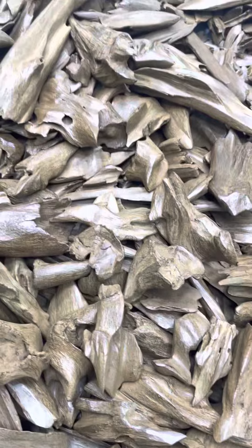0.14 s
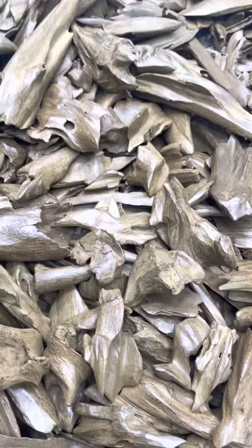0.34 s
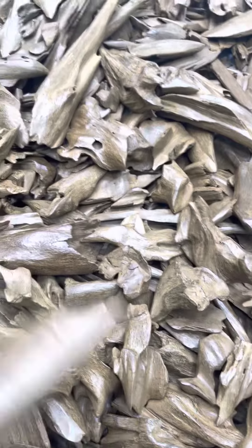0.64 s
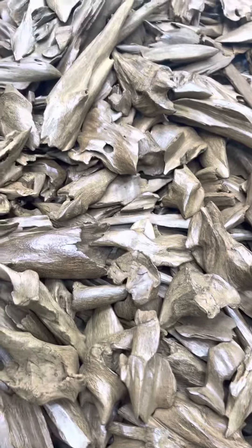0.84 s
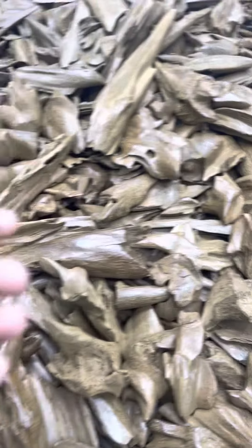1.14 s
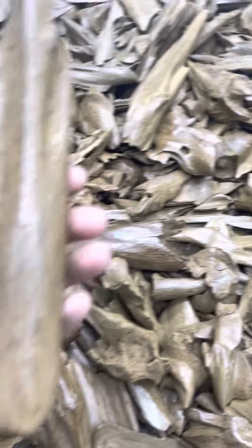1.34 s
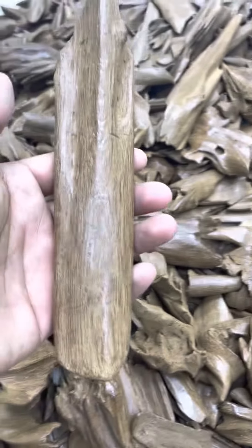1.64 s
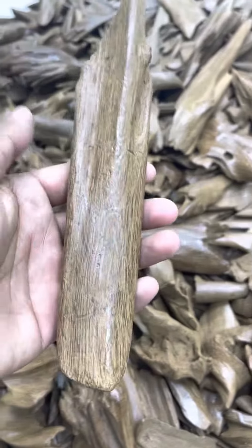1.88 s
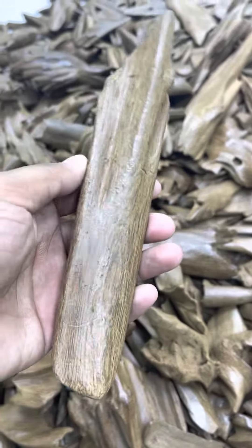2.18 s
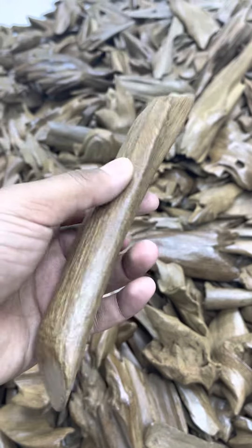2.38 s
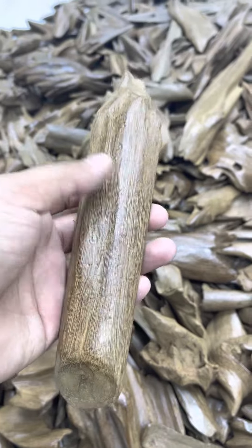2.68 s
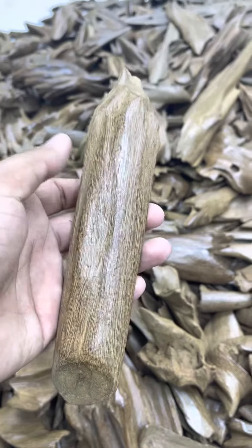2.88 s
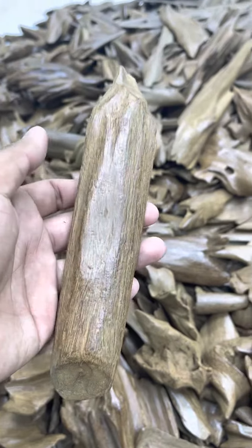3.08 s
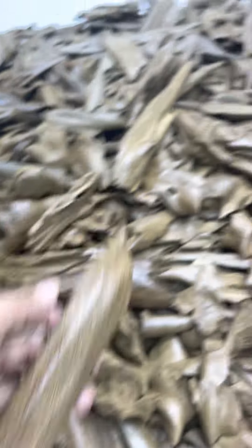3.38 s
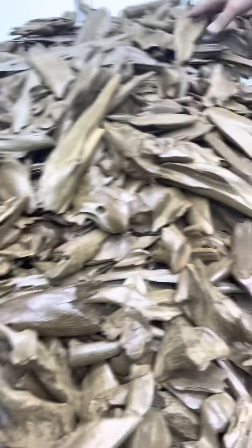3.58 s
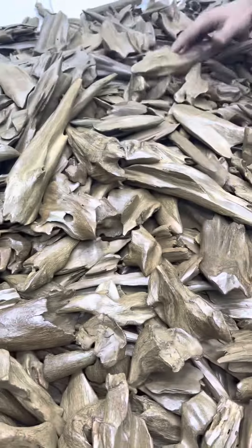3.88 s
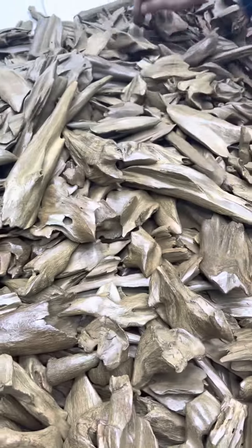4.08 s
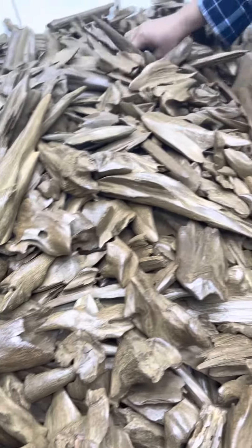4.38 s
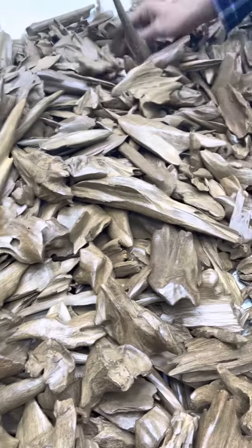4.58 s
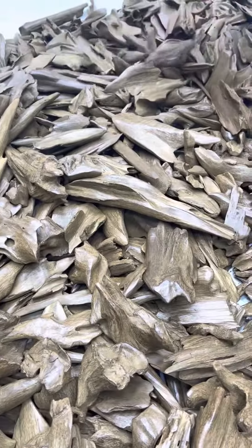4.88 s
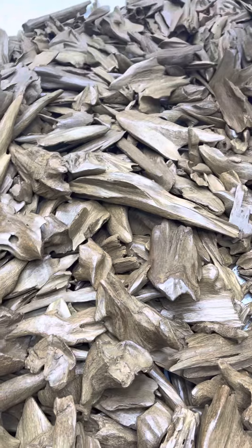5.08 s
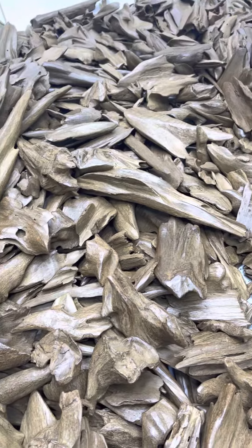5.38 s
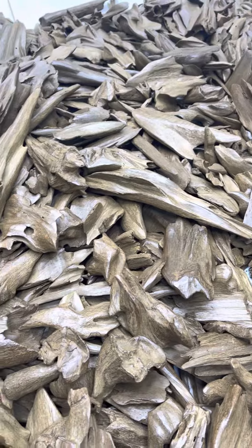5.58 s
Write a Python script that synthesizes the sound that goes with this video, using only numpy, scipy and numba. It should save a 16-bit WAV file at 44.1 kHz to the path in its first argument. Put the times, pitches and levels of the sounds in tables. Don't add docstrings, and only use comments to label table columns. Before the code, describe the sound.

Close to a phone indoors, a hand stirs a big heap of dry wood chips. Sparse soft taps grow into dense crackling rustle and bright splinter snaps. Midway a short stick clacks down and bounces once, then loud chip knocks ring on, thinning to a few last settling taps. A faint far-off double boom and low room rumble lie beneath.

```python
import sys
import numpy as np
from scipy import signal
from scipy.fft import rfft, irfft, next_fast_len
from scipy.io import wavfile
from scipy.ndimage import uniform_filter1d
from numba import njit

SR = 44100
rng = np.random.default_rng(int(sys.argv[2]) if len(sys.argv) > 2 else 0)


def volts_from_db(level):
    exponent = np.asarray(level, float) / 20
    return 10 ** exponent


def master_out(mix):
    frames = np.transpose(np.atleast_2d(mix))
    ceiling = np.clip(frames, -1, 1)
    pcm = np.round(ceiling * 32767).astype(np.int16)
    wavfile.write(sys.argv[1], SR, pcm)


N = 252693

# [t/s, level/dB]
RUMBLE_SWELL = [(0, -49.5), (.45, -48.5), (1.5, -48), (2.03, -46), (2.46, -43), (2.8, -49.5), (4.15, -51.5),
                (4.5, -47.5), (5.73, -50.5)]
# [f/Hz, level/dB]
RUMBLE_COLOUR = [(12, -41), (22, -24), (32, -1.5), (55, 10), (189, 0.5), (225, 1), (476, -6), (524, -12),
                 (576, -5), (900, -7.5), (1170, -16), (1980, -120)]
# [f/Hz, level/dB]
HISS_COLOUR = [(300, 4.5), (2000, -5), (5000, -10.5), (11500, 1), (12500, -47)]
HISS_DB = -54.5
WAKE_S, WAKE_FROM = 0.29, 0.48
# [f/Hz, t60/s]
WALLS = [(200, 0.63), (1000, 1), (3000, 0.54), (6000, 0.47), (12000, 0.58)]
# [t/s, level/dB, f/Hz]
BOOMS = [
    (2.401, -36, 118),
    (2.565, -40.5, 74),
]
BOOM_RISE_S, BOOM_FADE_DB_PER_S, BOOM_SAG_PER_S = 0.016, 63, 1.57

# [t/s, peak level/dB, f/Hz, t60/s]
THUMPS = [
    (.87, -39, 192, 0.22),
    (1.579, -38, 151, .3),
    (2.956, -38, 298, 0.055),
    (3.085, -35, 312, 0.068),
    (3.54, -25.5, 330, 0.041),
    (3.54, -19, 570, 0.033),
    (3.563, -33.5, 264, 0.06),
    (4.25, -42, 310, .08),
    (5.439, -39.5, 192, 0.22),
]
# [t/s, peak level/dB]
SPARKS = [(1.2037, -44), (1.2674, -55), (1.9594, -37), (2.1594, -36), (2.1755, -36), (2.5072, -38),
          (2.61, -37), (2.7886, -45), (3.0044, -52), (3.0974, -43), (3.2196, -35), (3.2784, -30),
          (3.6152, -44), (4.0634, -39), (4.0745, -24), (4.1036, -32), (4.1195, -35), (4.3051, -44),
          (4.59, -50), (4.6034, -50)]
# [t/s, peak level/dB, f/Hz]
TAPS = [(0.209, -35, 1340), (0.243, -27.5, 2520), (0.346, -31, 1900), (0.495, -28, 1310),
        (0.529, -23, 2080), (0.547, -28, 1390), (0.575, -23, 2260), (0.632, -30, 1240), (0.666, -24, 2030),
        (0.893, -24, 2120), (0.949, -23, 2230), (0.995, -25, 1890), (1.016, -23.5, 1910),
        (1.081, -22, 2250), (1.205, -35, 2480), (1.232, -31, 2350), (1.249, -28, 1190), (1.27, -27, 2540),
        (1.368, -40, 830), (1.427, -33, 3250), (1.848, -17, 4260), (1.999, -18, 1890), (2.044, -13, 2320),
        (2.062, -16, 1190), (2.09, -17.5, 1000), (2.244, -17, 2070), (2.29, -23, 1300), (2.35, -22, 1830),
        (2.459, -21, 2100), (2.594, -10, 6300), (2.795, -28, 1600), (3.088, -13, 2100), (3.148, -14, 2000),
        (3.231, -10.5, 2720), (3.415, -21, 3720), (3.473, -26, 2820), (3.699, -11, 2360),
        (3.869, -20, 3020), (3.884, -8, 2700), (3.919, -19, 2870), (4.103, -15, 6240), (4.246, -22, 2150),
        (4.345, -12, 1650), (4.361, -15, 1680), (4.59, -11, 2220), (4.734, -26, 1620), (5.1, -35, 2450),
        (5.167, -33, 960), (5.247, -36, 1920), (5.297, -39, 1900), (5.349, -30, 2300), (5.367, -23, 2750),
        (5.534, -21.5, 3650), (5.616, -38, 860), (5.689, -24, 710)]
# [t/s, peak level/dB]
TICKS = [(.252, -34), (.496, -36), (1.174, -33.5), (1.183, -39), (1.204, -32.5), (1.216, -34), (1.252, -28),
         (1.268, -30), (1.79, -22.5), (1.928, -14.5), (1.981, -19.5), (2.175, -19), (2.246, -18.5),
         (2.294, -16.5), (2.35, -19), (2.497, -20), (2.508, -23), (2.594, -21.5), (2.653, -26),
         (2.737, -20.5), (2.758, -23.5), (2.956, -27), (2.974, -31), (3.01, -24), (3.038, -30),
         (3.097, -14), (3.132, -19), (3.222, -24), (3.2313, -19), (3.277, -15.5)]
# [t/s, peak level/dB]
TICKS_AFTER = [(3.54, -15), (3.562, -18.5), (3.5809, -24), (3.615, -20.5), (3.643, -18.5), (3.895, -17.5),
               (4.042, -19.5), (4.064, -21), (4.075, -18.5), (4.119, -6), (4.153, -21), (4.2078, -18.5),
               (4.249, -22), (4.281, -20.5), (4.306, -18.5), (4.5907, -18.5), (4.715, -26.5), (4.734, -31),
               (4.837, -25), (5.099, -38), (5.1544, -31.5), (5.329, -41), (5.389, -35), (5.428, -30),
               (5.447, -43), (5.472, -41), (5.504, -35.5), (5.663, -36), (5.716, -36)]
SNAP_S, SNAP_LOW_HZ = .0055, 5420
SNAP_TOP_HZ, SNAP_TOP_AFTER_HZ = 14700, 12100
SNAP_ASIDE_DB = 10.5

# [from t/s, to t/s, f/Hz, level/dB]
ROCKING = [(0.363, .58, 1245, -46.5), (0.878, 1.047, 1910, -45), (1.78, 1.998, 2750, -36),
           (2.73, 2.92, 1660, -46), (2.722, 3.141, 2070, -38), (3.078, 3.299, 2720, -37.5),
           (3.581, 3.747, 1770, -52), (3.85, 4.1, 2926, -35.5), (4.32, 4.756, 1680, -36.5),
           (4.52, 4.747, 2295, -39.5), (4.58, 4.952, 1273, -47), (4.954, 5.067, 932, -41.5),
           (5.15, 5.191, 933, -50), (4.3, 4.32, 2660, -35.5)]
# [t/s, peak level/dB, ring
# f/Hz, ring share level/dB]
KNOCKS = [(0.363, -20.5, 2240, -11), (.391, -29, 1290, 0), (.446, -28, 1250, -8), (.514, -20, 1400, -3.5),
          (.702, -35, 1970, 7), (.766, -22.5, 2150, -12), (.832, -23, 1580, -8), (.905, -22, 4030, -9),
          (.93, -37, 1770, 1), (1.068, -20, 2330, -9.5), (1.441, -25.5, 3370, -5), (1.495, -21.5, 1370, -9),
          (1.768, -27.5, 2280, -2), (1.787, -14, 2870, -4.5), (1.875, -24, 2200, -2),
          (1.932, -7.5, 2845, -9.5), (1.963, -8, 3600, -9), (2.498, -23, 2600, -5), (2.623, -16, 1780, -8),
          (2.673, -14, 2870, -11), (2.737, -25.5, 1660, 3.5), (2.851, -25.5, 1655, 4.5),
          (2.887, -27, 1600, 5.5), (2.955, -20, 1095, 0.5), (3.017, -15.5, 2780, -10.5),
          (3.098, -10, 2050, -9.5), (3.131, -12, 2770, -2), (3.222, -10, 2830, -23),
          (3.274, -11.5, 2580, -13),
          (3.628, -4.5, 1715, -19), (3.683, -26, 2400, 4), (3.786, -18.5, 2630, -4),
                (3.8, -13, 2200, -11), (3.846, -21, 3160, -3), (3.896, -9, 3910, -21),
                (4.039, -29, 1775, -0.5), (4.098, -31.5, 2150, 1), (4.159, -21, 1772, 5.5),
                (4.199, -12, 1800, -10), (4.292, -6.5, 3620, -12), (4.325, -17, 1687, -3.5),
                (4.525, -16, 2320, -5), (4.554, -16, 2310, -15), (4.6, -30.5, 1293, 2),
                (4.639, -22.5, 3430, -5), (4.714, -16, 2180, -24), (4.756, -25, 2525, -8),
                (4.838, -21, 2280, -24), (4.87, -15.5, 1295, -10.5), (4.968, -30, 930, -2),
                (5.003, -17, 2804, -13), (5.154, -27, 2940, -9), (4.307, -11, 2710, -11.5),
                (4.42, -35, 2330, -6), (4.899, -21.5, 1277, -8.5), (5.03, -25, 2490, -9),
                (5.071, -46, 1880, -14),
          (5.197, -42, 1020, 4), (5.32, -22.5, 1950, -6), (5.332, -21, 1130, -32),
               (5.39, -18.5, 1230, -29), (5.421, -27, 900, -16), (5.43, -9, 2267, -12.5),
               (5.45, -14, 1450, -12.5), (5.477, -18.5, 1080, -25), (5.509, -20, 1740, -12.5),
               (5.525, -28.5, 706, 0.5), (5.632, -22, 2620, -14), (5.66, -20.5, 1940, -6.5),
               (5.669, -22.5, 760, 0), (5.715, -11.5, 1450, -13)]
ALL_KNOCKS = KNOCKS
RING_T60_S, RING_AFTER_T60_S = 0.034, 0.089
LOOSE_FROM_S, LOOSE_TO_S = 3.6, 5.18
CRACK_DB, CRACK_S = -7, 0.0009

# [f/Hz, level/dB, t60/s]
STICK = [(750, -4.5, 0.021), (1722, 0.5, 0.037), (2870, -2.5, 0.033), (3890, -17.5, 0.078)]
# [t/s, level/dB, ring length share/0-1]
DROPS = [
    (3.5392, -5.5, 0.88),
    (3.5618, 0, 0.23),
]

# [t/s, rustle level/dB, brightness/dB, crowding/0-1 from single chips to a sliding mass]
HAND = [(0, -65, 8, 0.84), (.1, -57, -20, 0.71), (.39, -41.5, -7.5, 0.6), (.71, -44.5, -13, 0.57),
        (.92, -37, -10, .58), (1.17, -46, -15, 0.7), (1.35, -53, 5, 0.4), (1.75, -43.5, -2, 0.96),
        (1.95, -27.5, -5, .95), (2.27, -25.5, -6.5, .65), (2.46, -36, -6, .55), (3.25, -34, -8.5, .52),
        (3.5, -43, -8, 0.6), (3.69, -24, -9, .52), (4.04, -34, -8.5, .58), (4.82, -37, -9, 0.6),
        (5.12, -55.5, -8, 0.5), (5.73, -50.5, -14, 0.3)]
# [peak t/s, level/dB, swell/s, settle/s, brightness/dB]
SLIDES = [(.524, -46, 0.071, 0.13, -14), (1.246, -39.5, 0.059, 0.14, -8), (1.189, -59, 0.012, 0.12, 0),
          (1.506, -28.5, 0.15, 0.35, -9.5), (1.802, -34.5, 0.12, 0.25, -11), (2.524, -33, 0.17, 0.44, -7.5),
          (2.829, -38, 0.26, 0.094, 9), (3.127, -28.5, 0.12, .15, 1), (3.253, -34.5, 0.24, 0.22, 8),
          (3.562, -15, 0.027, 0.028, -24), (4.099, -30, 0.12, 0.27, -6), (4.329, -24.5, 0.12, 0.27, -6.5),
          (4.621, -32, 0.33, 0.086, -3), (4.744, -32.5, 0.088, 0.14, -6.5),
          (4.989, -32.5, 0.38, 0.18, -10.5), (5.183, -39.5, 0.23, 0.033, -33),
          (5.343, -42, 0.068, 0.13, -13), (5.458, -37.5, 0.25, 0.071, -6), (5.665, -39.5, 0.052, 0.25, -11)]
SLIDE_SPAN_DB = 22
CROWD_LEAST, CROWD_PER_S = .28, 1.3
# [f/Hz, level/dB]
CHIPS = [(200, -6.5), (500, -9.5), (900, -1.5), (1800, 2.5), (3000, 4), (4000, -1.5), (5500, -21)]
# [f/Hz, level/dB]
SPLINTERS = [(2500, 20.5), (4500, -1.5), (6000, -3.5), (8000, -1), (11800, -0.5), (12800, -38)]
# [f/Hz, level/dB]
FARTHER = [(9000, 0), (11000, -3.5), (12000, -10), (13000, -14)]
SLIP_DB, GRIT_DB = 1.5, 2.5
SHAKE_DB, SHAKE_S = 5.5, .012

# [f/Hz, level/dB]
MICROPHONE = [(10000, 0.5), (11000, -3.5), (11700, -12), (12300, -11.5), (13500, -20), (16000, -28)]
# [f/Hz, phase/rad]
LEAD = [(30, 0), (1800, .05), (2200, .35), (2600, .9), (3600, .8), (4300, 1.4), (4900, 3.2), (5300, 5.2),
        (5800, 6.27), (6150, 6.3), (8500, 9.36), (9550, 9.48), (10800, 10.9), (11900, 12.56)]
# [f/Hz, likeness/0-1]
ALIKE = [(100, 1), (300, .97), (800, .7), (1200, .75), (1750, 1), (2400, .75), (3100, .35), (3700, .75),
         (5950, 1), (7300, .84), (8600, .99), (9500, .99), (11000, .72), (12100, .965)]


def evened(x):
    return x / np.sqrt(np.mean(x ** 2) + 1e-20)


def read(points, hz):
    f, value = np.transpose(points)
    return np.interp(np.log(hz + 1), np.log(f + 1), value)


def along(rows):
    s, *columns = np.transpose(rows)
    return [np.interp(np.arange(N) / SR, s, c) for c in columns]


def coloured(x, points):
    size = next_fast_len(N)
    gain = volts_from_db(read(points, np.fft.rfftfreq(size, 1 / SR)))
    return irfft(rfft(x, size) * gain, size)[:, :N]


@njit
def add(mix, starts, hz, t60, gains, rate):
    for k in range(len(starts)):
        step = np.exp(2j * np.pi * hz[k] / rate - np.log(1000) / (t60[k] * rate))
        swing, soft, rise = 1 + 0j, 1.0, np.exp(-2 * hz[k] / rate)
        for n in range(starts[k], min(starts[k] + int(t60[k] * rate), mix.shape[1])):
            mix[0, n] += gains[k, 0] * swing.imag * (1 - soft)
            mix[1, n] += gains[k, 1] * swing.imag * (1 - soft)
            swing *= step
            soft *= rise


def rings(s, hz, t60, db):
    out = np.zeros((2, N))
    gains = volts_from_db(db)[:, None] * rng.choice([-1., 1.], (len(s), 2))
    starts = np.round(s * SR).astype(np.int64)
    add(out, starts, np.clip(hz, 50, 16000), np.clip(t60, .0005, .3), gains, float(SR))
    return out


def clatter(s, db, length, lo_hz, hi_hz, cycles, count):
    late, tune, size = rng.random((len(s), count, 3)).T
    at = s + np.clip(length, .001, .04) * late ** 1.6
    hz = lo_hz * (hi_hz / lo_hz) ** tune
    slip_db = db - 1.04 * late - 10.6 * size
    return rings(*(np.ravel(c) for c in (at, hz, cycles / hz, slip_db)))


def floor():
    rumble, hiss = (evened(coloured(rng.standard_normal((2, N)), c)) for c in (RUMBLE_COLOUR, HISS_COLOUR))
    tone = volts_from_db(along(RUMBLE_SWELL)[0] + 1.0) * rumble + volts_from_db(HISS_DB) * hiss
    asleep = (1 - WAKE_FROM) * np.clip(1 - np.arange(N) / SR / WAKE_S, 0, 1)
    return tone - asleep * coloured(tone, [(250, -40), (400, 0), (3000, 0), (5000, -40)])


def room(x):
    echoes = np.zeros((2, SR // 2))
    at = np.arange(200, SR // 2 - 20, 20) + rng.integers(0, 20, (2, (SR // 2 - 201) // 20))
    np.put_along_axis(echoes, at, rng.choice([-1., 1.], at.shape), 1)
    hz, t, z = signal.stft(echoes, SR, nperseg=256)
    t60 = np.clip(read(WALLS, hz), .05, .6)[:, None]
    tail = signal.istft(z * volts_from_db(-60 * t / t60), SR, nperseg=256)[1]
    return signal.fftconvolve(x[None], tail / np.linalg.norm(tail[0]), axes=1)[:, :N]


def thud():
    s, db, hz = np.transpose(BOOMS)[:, :, None]
    late = np.maximum(np.arange(N) / SR - s, 0)
    wobble = evened(uniform_filter1d(rng.standard_normal(N), 900))
    sag = np.exp(-BOOM_SAG_PER_S * late * (hz / hz[0]) ** 4.3)
    pitch = hz * sag * (1 + 0.065 * wobble)
    shape = np.minimum(late / BOOM_RISE_S, 1) * volts_from_db(db - BOOM_FADE_DB_PER_S * late)
    return np.sqrt(2) * (shape * np.sin(2 * np.pi * np.cumsum(pitch, axis=1) / SR)).sum(0)


def thumps():
    s, db, hz, t60 = np.transpose(THUMPS)
    return rings(s, hz, t60, db) * [[1], [0]]


def sparks():
    s, db = np.transpose(SPARKS)
    return clatter(s, db + 20.0, 0.0067, 10200, 15800, 15.0, count=24) * volts_from_db(np.array([[0], [6.0]]))


def ticks():
    s, db = np.transpose(TICKS + TICKS_AFTER)
    top_hz = np.repeat([SNAP_TOP_HZ, SNAP_TOP_AFTER_HZ], [len(TICKS), len(TICKS_AFTER)])
    snaps = clatter(s, db + 5.0, SNAP_S, SNAP_LOW_HZ, top_hz, 12.5, count=30)
    return snaps * volts_from_db(np.array([[0], [SNAP_ASIDE_DB]]))


def taps():
    s, db, hz = np.transpose(TAPS)
    ring = rings(s, hz, 45 / hz, db - 9.0)
    clump = clatter(s, db - 6.0, .004, 0.65 * hz, 3.1 * hz, 8.3, count=16)
    edge = clatter(s, db - 16.0, 0.00053, 900, 9000, 2.2, count=8)
    return ring + clump + edge


def rocking():
    start, stop, hz, db = np.transpose(ROCKING)
    when, size, tune = rng.random((len(ROCKING), 40, 3)).T
    at = start + (stop - start) * when
    tuned_hz = hz * (1 + 0.026 * (tune - .5))
    t60 = 0.053 + 0 * when
    return rings(*(np.ravel(c) for c in (at, tuned_hz, t60, db + 5.4 * size ** 2)))


def cracks():
    s, db, *_ = np.transpose(ALL_KNOCKS)
    return clatter(s, db + CRACK_DB, CRACK_S, 630, 7400, 3.8, count=16)


def knocks():
    s, db, hz, ring_db = np.transpose(ALL_KNOCKS)
    loose = (s > LOOSE_FROM_S) & (s < LOOSE_TO_S)
    t60 = np.where(loose, RING_AFTER_T60_S, RING_T60_S)
    return rings(s, hz, t60, db + ring_db) + clatter(s, db - 4.5, .005, 0.46 * hz, 3.2 * hz, 4.64, count=30)


def stick():
    s, db, share = np.transpose(DROPS)
    hz, mode_db, t60 = np.transpose(STICK)
    ring_t60 = np.outer(share, t60).ravel()
    ring_db = np.add.outer(db, mode_db).ravel()
    body = rings(np.repeat(s, len(hz)), np.tile(hz, len(s)), ring_t60, ring_db)
    return body + clatter(s, db - 9.0, 0.0048, 650, 2850, 7.3, count=40)


def shaken():
    s = np.array([row[0] for row in ALL_KNOCKS + TAPS])
    late = np.arange(0, N, 50)[:, None] / SR - s
    return np.repeat(np.where(late > 0, np.exp(-abs(late) / SHAKE_S), 0).max(1), 50)[:N]


def stirring():
    level_db, bright_db, crowd = along(HAND)
    peak, db, swell, settle, slide_bright_db = np.transpose(SLIDES)[:, :, None]
    late = np.arange(0, N, 50) / SR - peak
    slides = volts_from_db(db - SLIDE_SPAN_DB * np.maximum(-late / swell, late / settle)) ** 2
    sums = (slides * c for c in (1, slide_bright_db, CROWD_LEAST + CROWD_PER_S * settle))
    power, bright, crowded = (np.repeat(s.sum(0), 50)[:N] for s in sums)
    hand = volts_from_db(level_db) ** 2
    total = hand + power
    return 10 * np.log10(total), (hand * bright_db + bright) / total, (hand * crowd + crowded) / total


def grains(crowd, lo_hz, hi_hz, cycles, spread_db, count):
    when, keep, size, *tune = rng.random((count, 7)).T
    at = (when * N).astype(int)
    hard_db = spread_db * (1.3 - crowd[at]) * np.minimum(-np.log(size), 5)
    share = 12. ** (crowd[at] - 1)
    db = np.where(keep < share, hard_db + 16.9 * crowd[at], -200) - 10 * np.log10(share)
    hz = lo_hz * (hi_hz / lo_hz) ** np.concatenate(tune[:2])
    t60 = cycles * 18.3 ** np.concatenate(tune[2:]) / hz
    return rings(np.tile(at / SR, 2), hz, t60, np.tile(db, 2) - 10 * np.log10(t60))


def rustle():
    level_db, bright_db, crowding = stirring()
    crowd = np.clip(crowding, 0, 1)
    chance = rng.standard_normal(N)
    slow, quick = (evened(uniform_filter1d(uniform_filter1d(chance, size=n), size=n // 2)) for n in (600, 160))
    grit_db = GRIT_DB * np.minimum(quick, 1.5) + 2 * SHAKE_DB * (shaken() - .3)
    slips_db = (1 - crowd) * SLIP_DB * slow + (1.2 - crowd) * grit_db
    big = evened(coloured(grains(crowd, 414.7, 5048, 8.9, 2.47, count=16000), CHIPS))
    fine = evened(coloured(grains(crowd, 3917, 13150, 19.0, 2.26, count=24000), SPLINTERS))
    fine = np.where(np.arange(N) < LOOSE_FROM_S * SR, fine, coloured(fine, FARTHER))
    heap = volts_from_db(level_db + slips_db) * (big + volts_from_db(bright_db + 7.0) * fine)
    return heap * (1.2 - crowd), heap[0] * crowd


def scene():
    background = floor() + thud()
    contacts = thumps() + sparks() + taps() + cracks()
    hits = ticks() + rocking() + knocks() + stick()
    near, far = rustle()
    echoes = room(volts_from_db(-9.0) * hits[0] + volts_from_db(-6.0) * far)
    return background + echoes + contacts + hits + near


def masked(ports, twin_db=15, frame_db=24.5, waver_db=5.5):
    z = signal.stft([ports[0] + ports[1], ports[0] - ports[1]], nperseg=1024)[2]
    power = abs(z[:, :512]) ** 2
    bands = power.reshape(2, 32, 16, -1).mean(2)
    loud = np.median(bands[:, 2:14].sum(0), axis=0)
    waver = evened(uniform_filter1d(rng.standard_normal(bands.shape[1:]), size=8))
    loud = loud * volts_from_db(2 * waver_db * waver)
    heard = (bands > bands[::-1] / volts_from_db(2 * twin_db)) & (bands > loud / volts_from_db(2 * frame_db))
    heard[:, :7] = True
    z[:, :512] *= np.repeat(heard, 16, axis=1)
    mid, side = signal.istft(z, nperseg=1024)[1][:, :N]
    return np.array([mid + side, mid - side]) / 2


def band_limit(x):
    return signal.sosfilt(signal.butter(12, 15710, fs=SR, output="sos"), x)


def record(dry):
    size = next_fast_len(N)
    hz = np.fft.rfftfreq(size, 1 / SR)
    alike = np.clip(read(ALIKE, hz), 0, 1)
    turn = np.exp(.5j * read(LEAD, hz))
    split = np.sqrt([(1 + alike) / 2, (1 - alike) / 2])
    front, aside = rfft(dry, size) * volts_from_db(read(MICROPHONE, hz)) * split
    ports = irfft([(front + aside) * turn, (front - aside) / turn], size)[:, :N]
    soft = .9 * np.tanh(ports / .9)
    return band_limit(masked(soft))


dry = scene()
out = record(dry)
master_out(out)
```